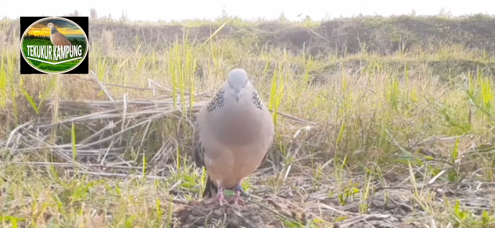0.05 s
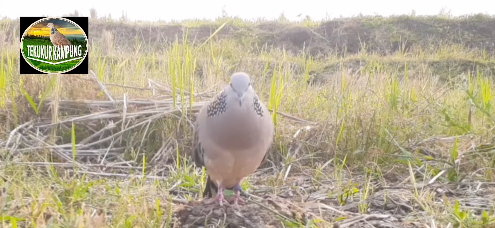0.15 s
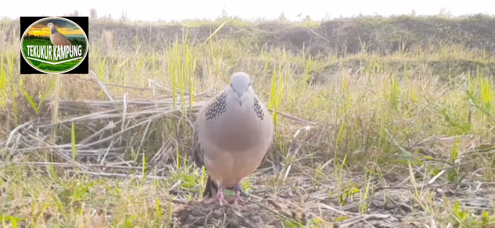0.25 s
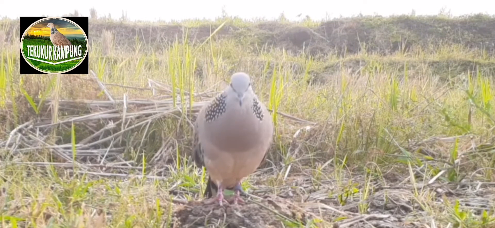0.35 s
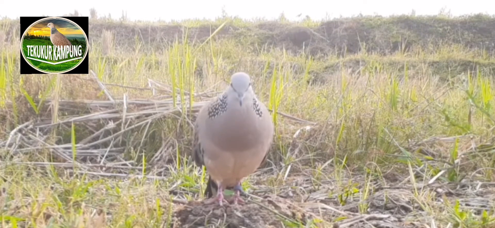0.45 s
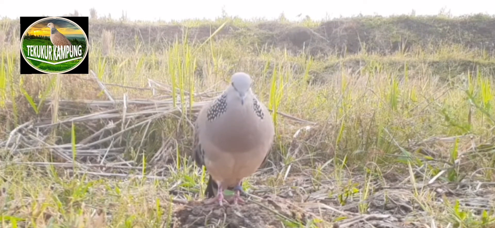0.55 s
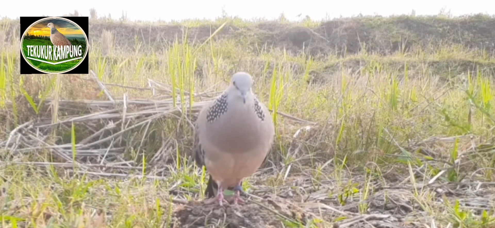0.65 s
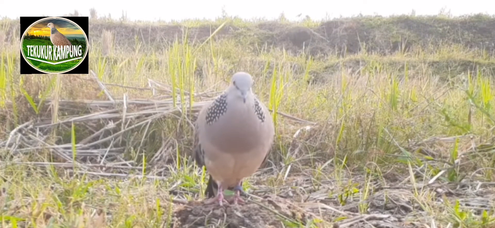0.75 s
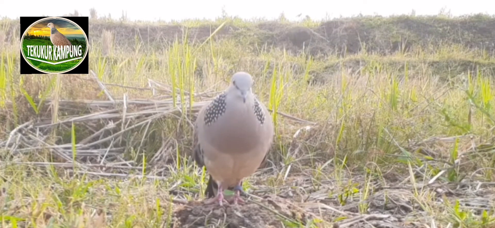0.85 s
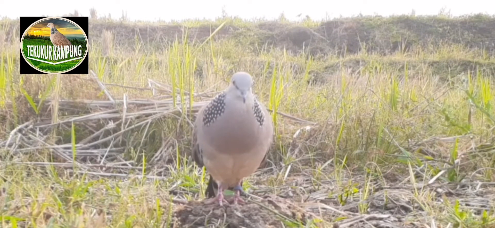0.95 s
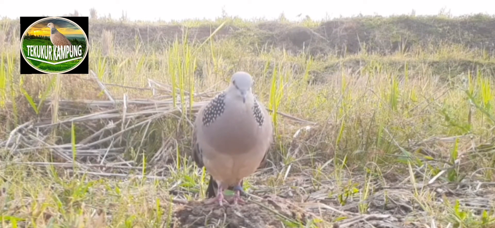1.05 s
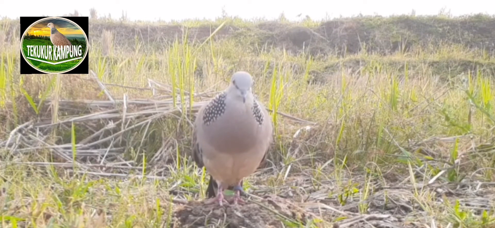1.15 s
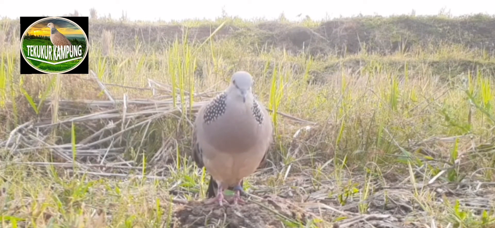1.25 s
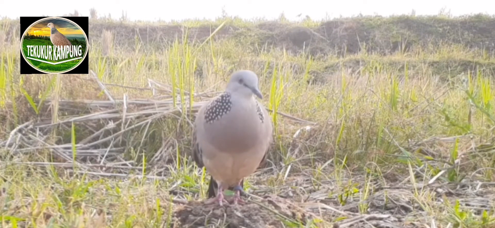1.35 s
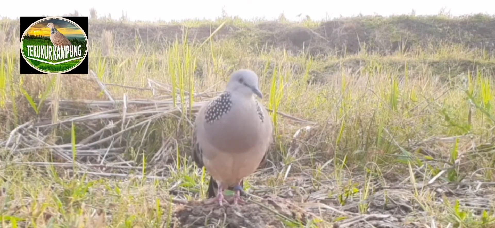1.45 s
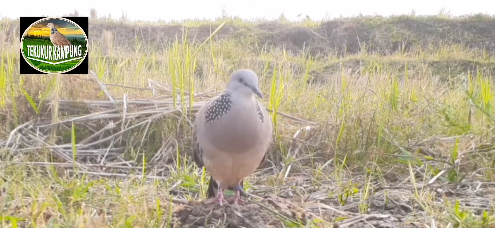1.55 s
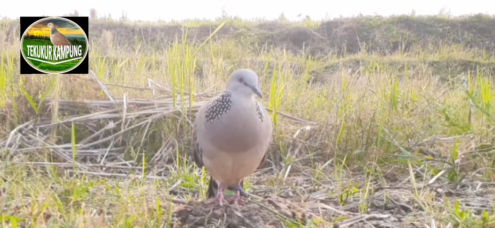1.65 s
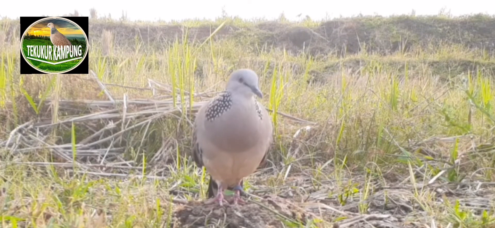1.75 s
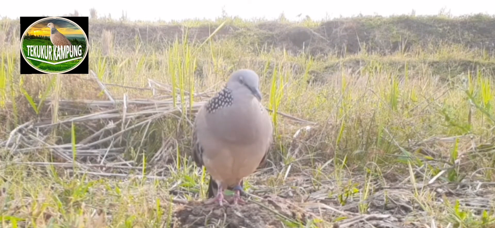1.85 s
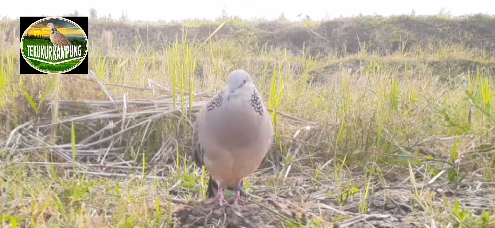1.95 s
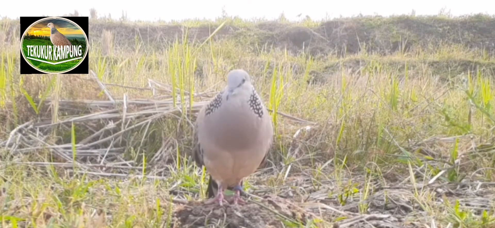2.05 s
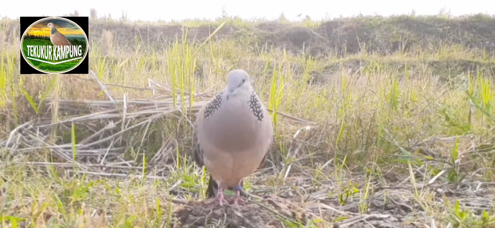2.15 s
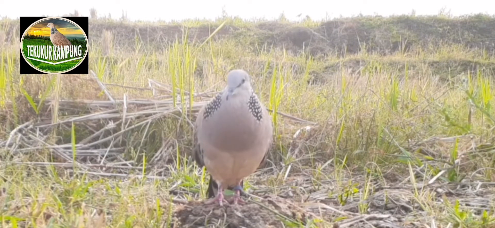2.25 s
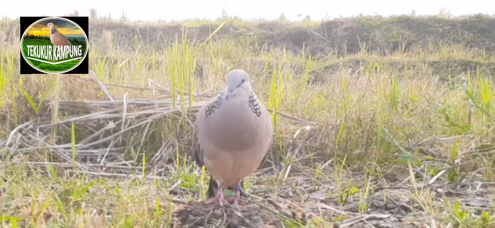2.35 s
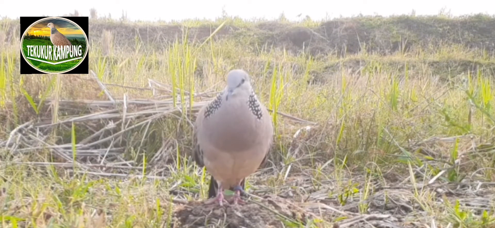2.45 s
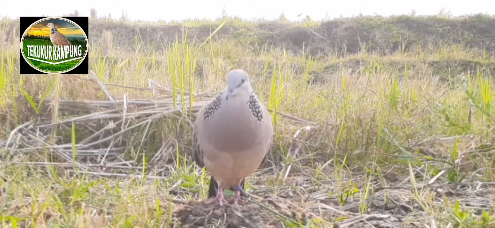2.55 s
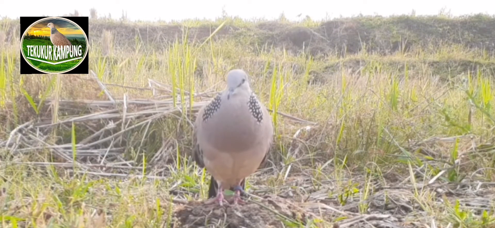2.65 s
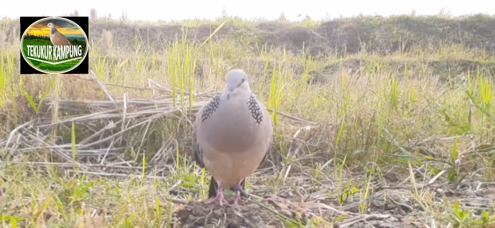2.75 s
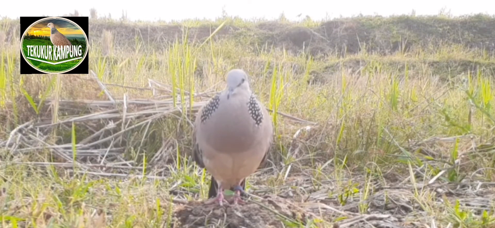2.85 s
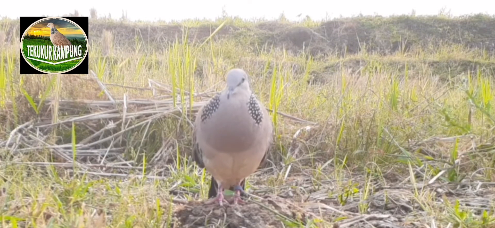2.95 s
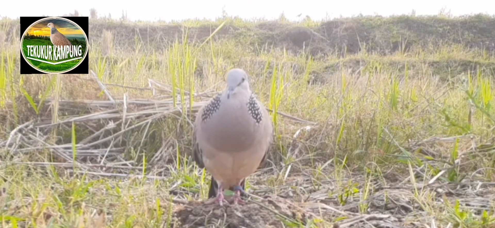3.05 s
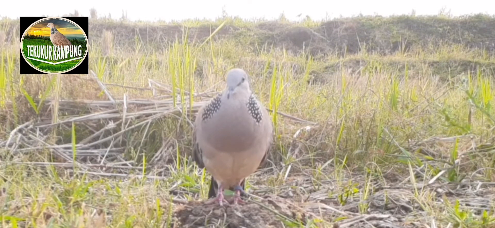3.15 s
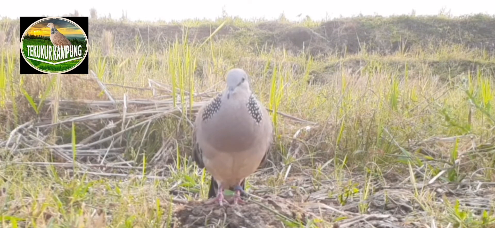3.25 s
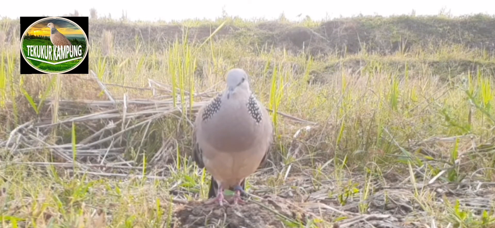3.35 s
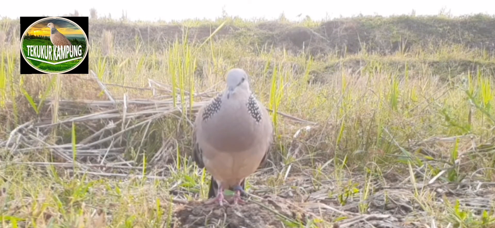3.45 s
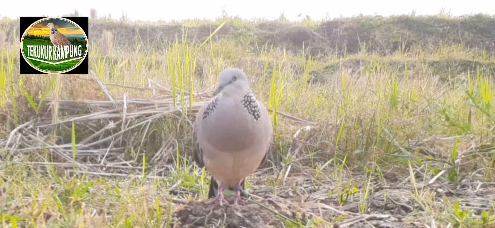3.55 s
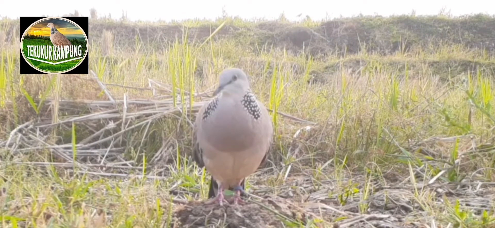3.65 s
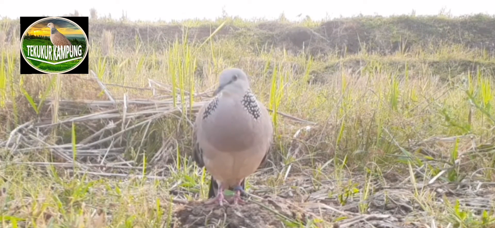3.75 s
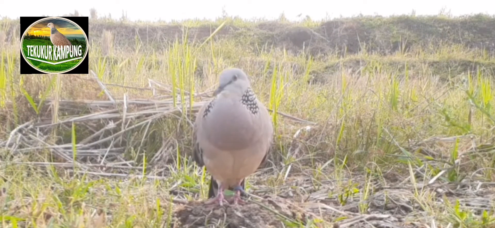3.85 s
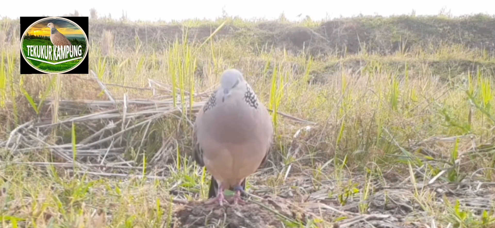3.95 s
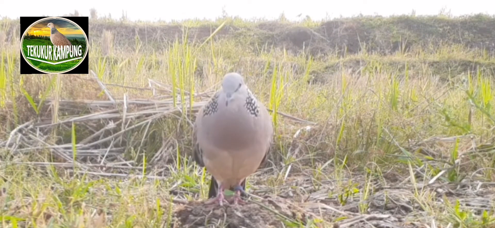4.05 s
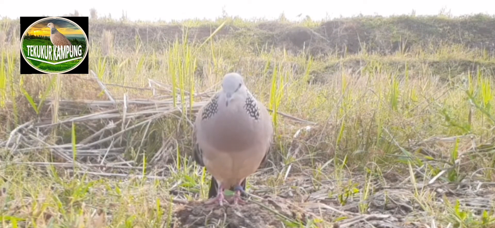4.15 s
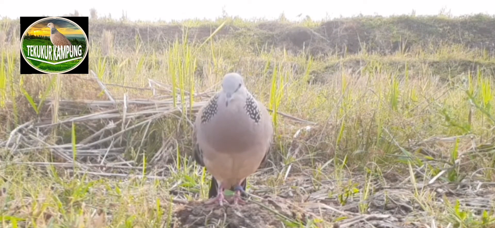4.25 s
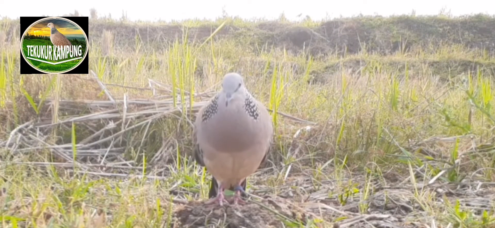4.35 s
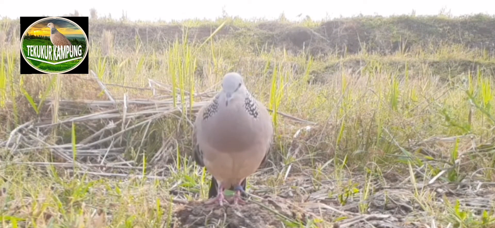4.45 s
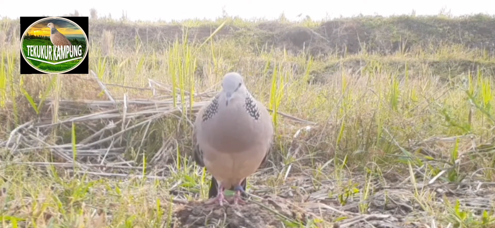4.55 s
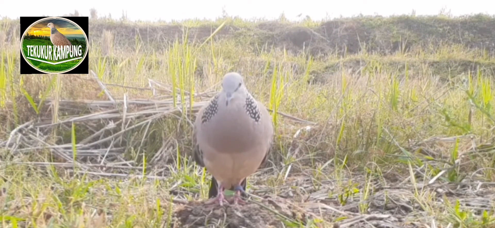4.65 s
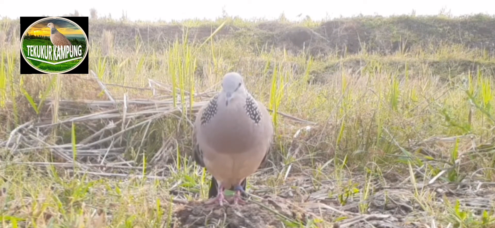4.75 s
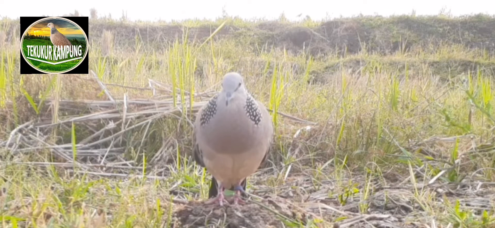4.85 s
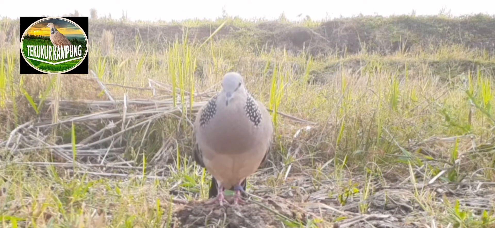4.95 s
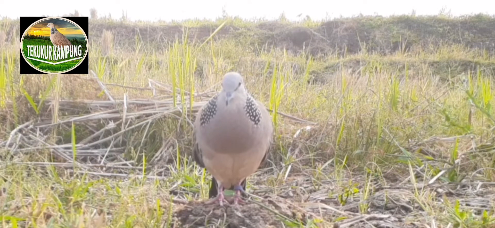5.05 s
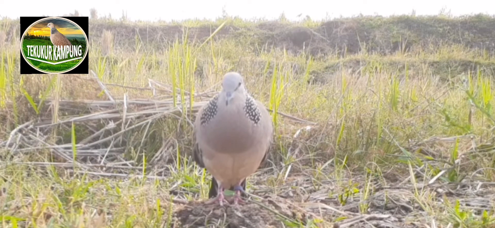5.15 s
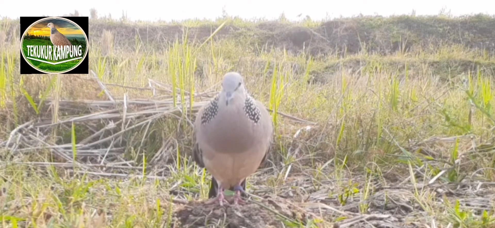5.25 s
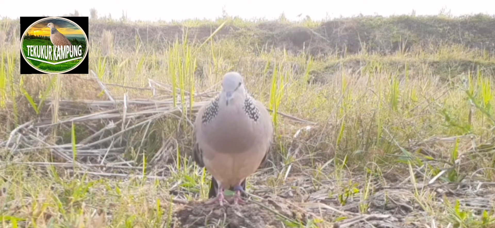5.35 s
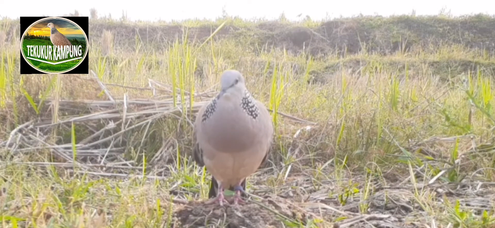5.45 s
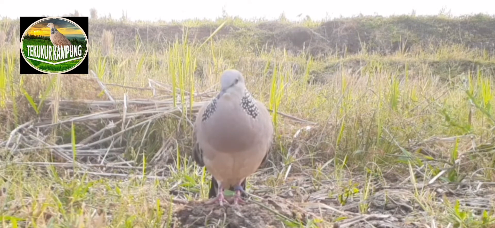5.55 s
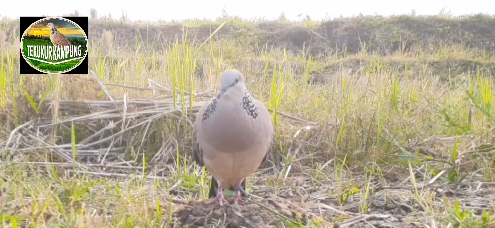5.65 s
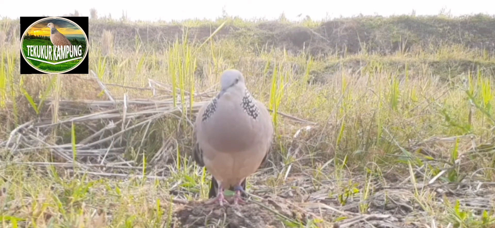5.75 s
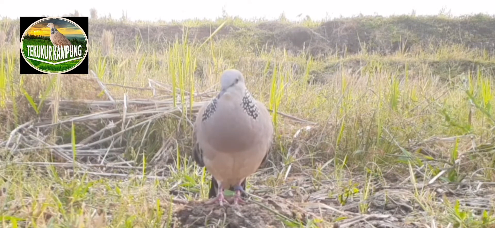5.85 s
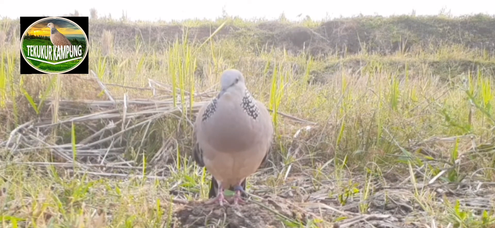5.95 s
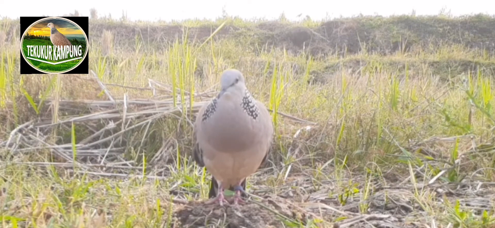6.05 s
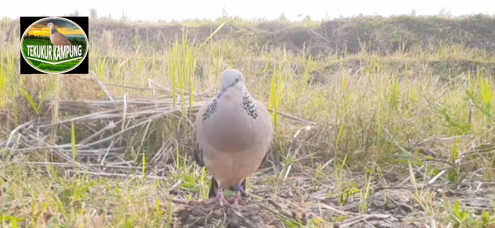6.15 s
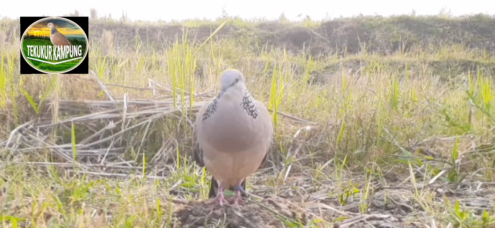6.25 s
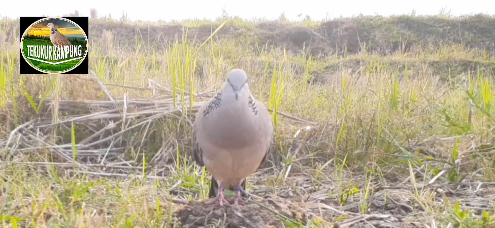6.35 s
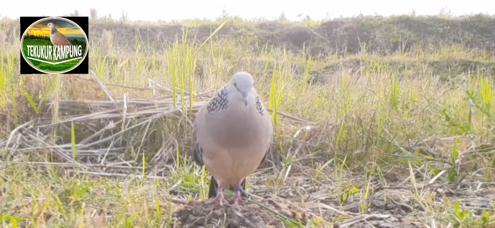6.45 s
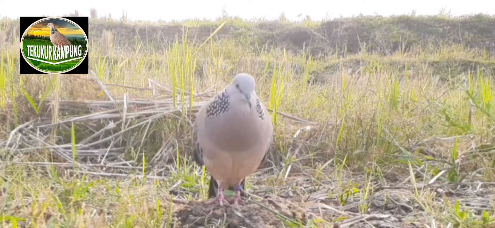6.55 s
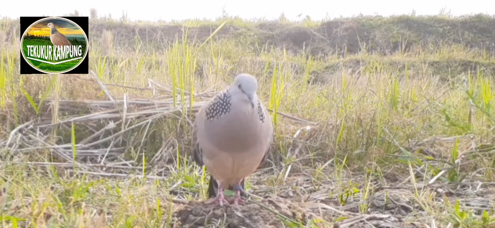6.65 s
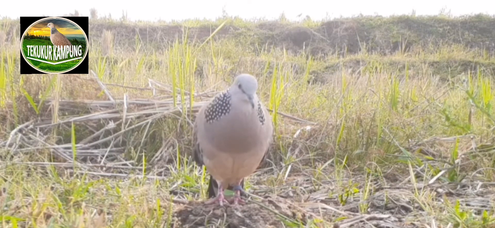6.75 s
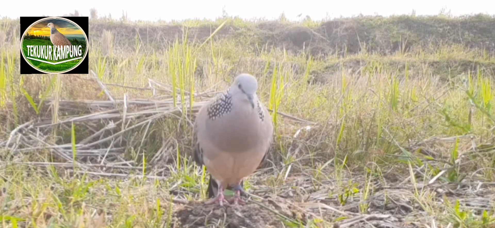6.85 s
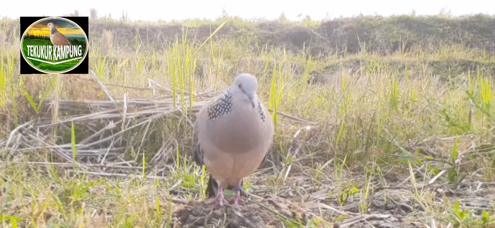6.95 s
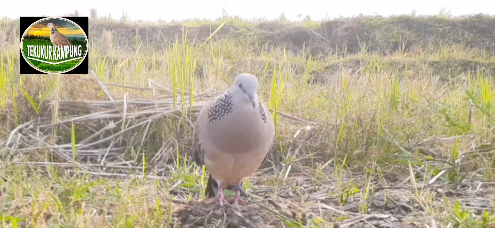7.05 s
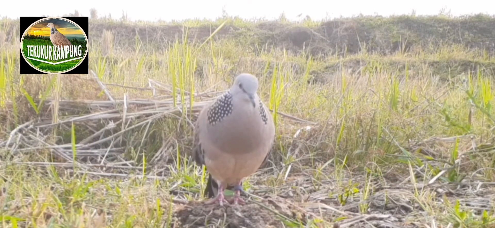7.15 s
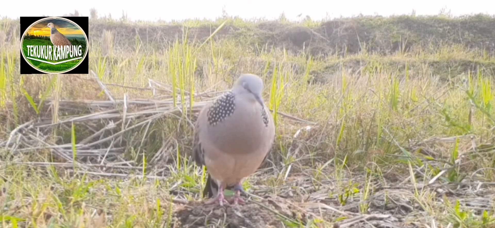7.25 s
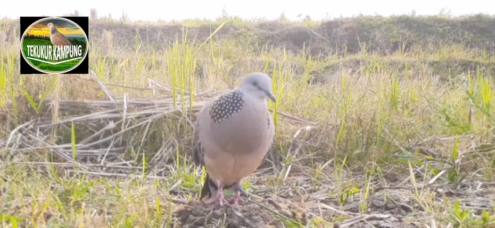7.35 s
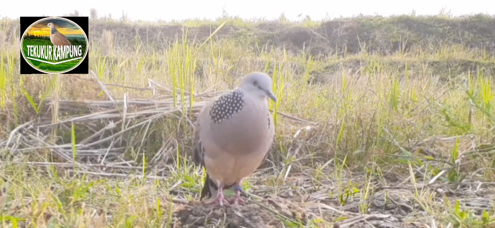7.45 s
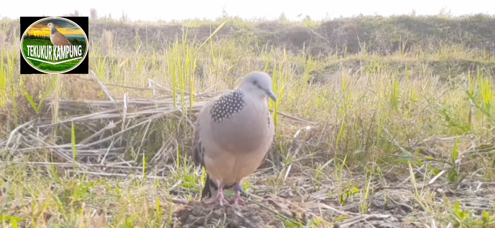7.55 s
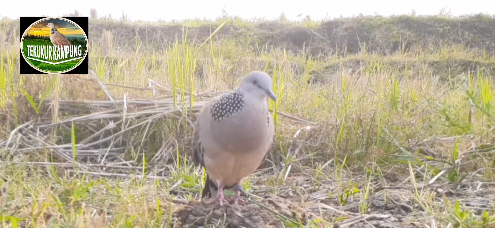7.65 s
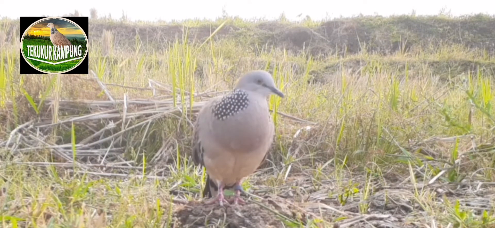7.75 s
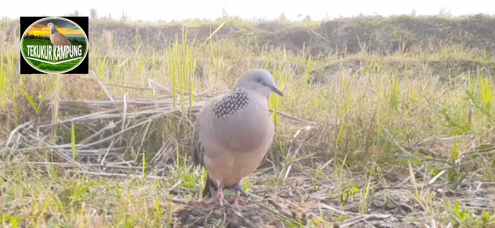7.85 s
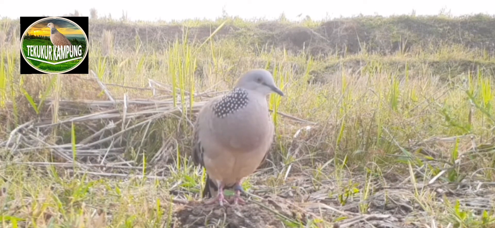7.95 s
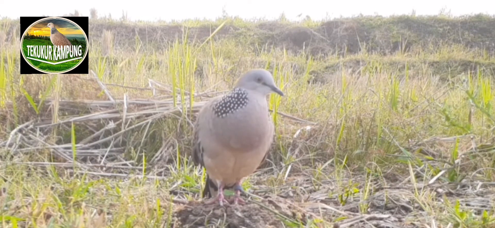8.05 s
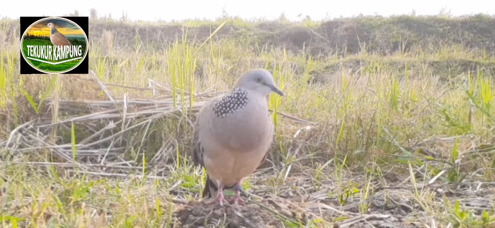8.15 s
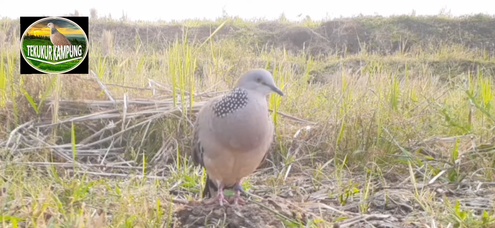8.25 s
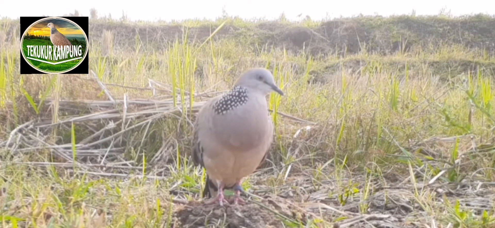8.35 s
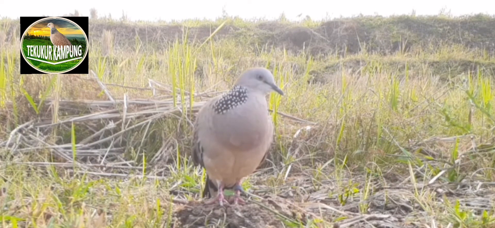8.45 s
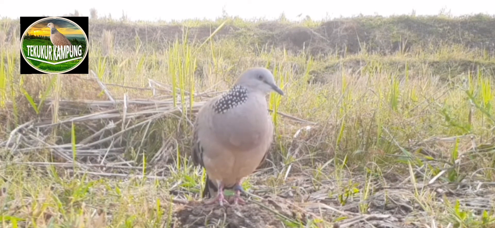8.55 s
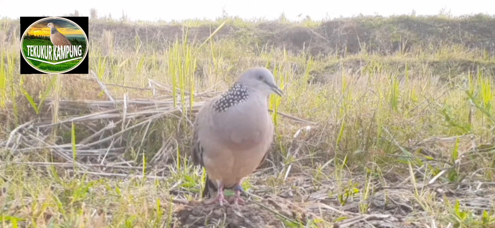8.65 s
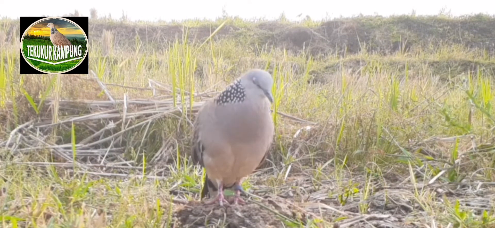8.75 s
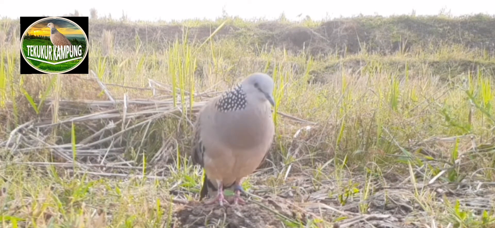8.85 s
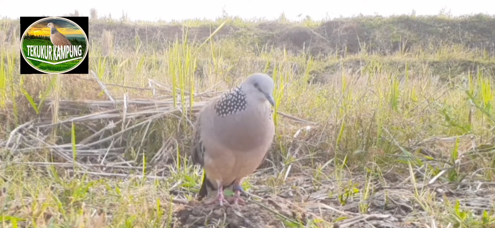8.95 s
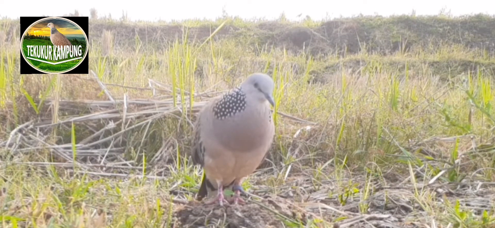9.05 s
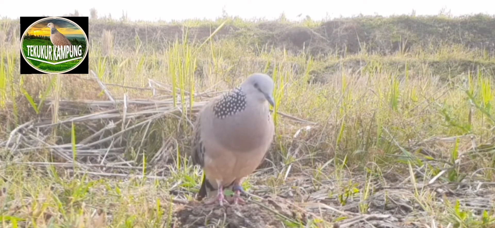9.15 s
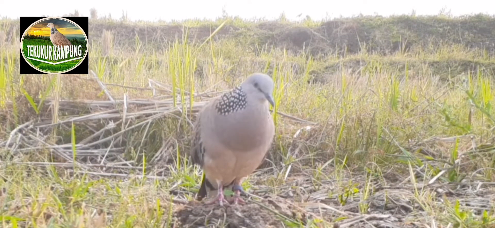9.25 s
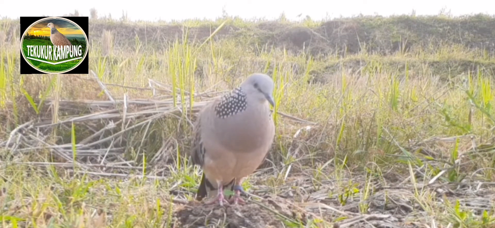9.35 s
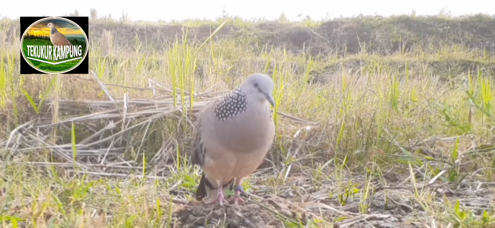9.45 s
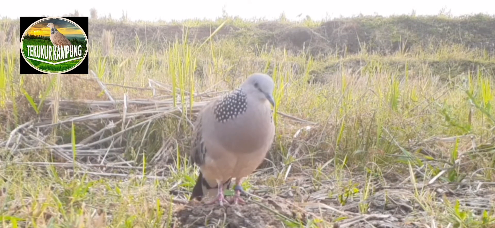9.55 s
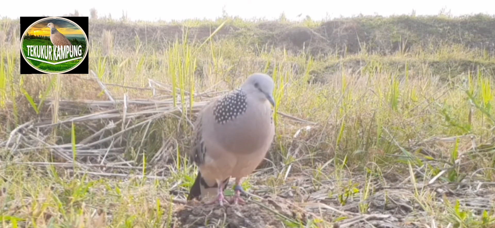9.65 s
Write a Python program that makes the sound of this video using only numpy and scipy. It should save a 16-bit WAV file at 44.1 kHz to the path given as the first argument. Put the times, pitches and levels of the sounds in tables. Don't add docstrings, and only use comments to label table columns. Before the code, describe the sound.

A spotted dove calls close to the microphone in a dry open field, slightly left of centre. Five times it gives two short, round hoots joined by a rattling murmur, then a longer fluttering coo that slides down and fades. Between calls there is faint low traffic rumble, soft air hiss and thin high cicadas to the left. Another dove answers very faintly from far off.

```python
import sys
import numpy as np
from scipy import signal
from scipy.fft import rfft, irfft
from scipy.io import wavfile
from scipy.ndimage import uniform_filter1d

SR = 44100
rng = np.random.default_rng(int(sys.argv[2]) if len(sys.argv) > 2 else 0)


def transcribe(signal):
    frames = np.atleast_2d(signal).T
    limited = np.clip(frames, -1, 1)
    pcm = np.round(limited * 32767).astype(np.int16)
    wavfile.write(sys.argv[1], SR, pcm)


def ratio_of_db(decibels):
    return 10 ** (np.asarray(decibels, float) / 20)


N = 427329

# start in seconds, faltering in seconds,
# level of the hoot in dB, level of the murmur after it in dB.
FIRSTS = [
    (.003, .081, -1, 6),
    (1.886, 1.958, -1.5, 1),
    (3.928, 4.005, -0.5, 0),
    (6.42, 6.492, 2, -1),
    (8.757, 8.833, 1, -0.5),
]
# start in seconds, start of the slide in seconds, level in dB, air at the bill in dB.
ROLLS = [
    (0.477, 0.868, 0.5, 4),
    (2.373, 2.726, 0.35, -1),
    (4.429, 4.803, 0.42, 1.5),
    (6.928, 7.302, 0.13, 1.5),
    (9.275, 9.642, 0.3, -.5),
]


def dove():
    pitch_hz, gain = pitch_and_gain(coos())
    rows = breaks()
    shut = valve(rows, spread=1.6, taper=.65)
    rolling = uniform_filter1d(shut, round(.035 * SR))
    leak = ratio_of_db(48 * np.log2(750 / pitch_hz) ** 2)
    flutter_hz = 97.7 * (1 + 0.074 * drift(5.2))
    quiver = 0.009 * leak * np.sin(2 * np.pi * np.cumsum(flutter_hz) / SR)

    tension = membrane_tension(gain, rows, rolling, quiver)
    phase = 2 * np.pi * np.cumsum(pitch_hz * tension) / SR
    flow = air_flow(gain, shut, quiver)

    coo = crop(pitch_hz, flow, phase)
    coo += overtones(gain, flow, leak, phase)
    coo += bill(flow, phase)
    coo += air_noise(gain, flow, rolling)
    return coo, gain


def coos():
    # seconds after its start, pitch in Hz, level in dB.
    first_hoot = [
        (.004, 539.4, -49),
        (.021, 645, -13.5),
        (.034, 717, -15),
        (.052, 733, -12.5),
        (.073, 706, -10.5),
        (.083, 631, -13.5),
        (.112, 473, -32.5),
    ]
    # seconds from full voice, pitch in Hz, level in dB.
    second_hoot = [
        (-.072, 453.3, -29.5),
        (0, 680.3, -8.5),
        (.011, 737, -11),
        (.033, 738, -10),
        (.073, 710.1, -8),
        (.088, 650, -9),
        (.096, 566, -17),
        (.11, 550.5, -37.5),
    ]
    # seconds after its start, pitch in Hz, level in dB.
    roll_shape = [
        (.004, 546, -48),
        (.02, 625, -14.5),
        (.05, 747.1, -15),
        (.32, 728, -10),
        (.365, 657, -11),
        (.44, 557, -18.5),
        (.5, 482, -29.5),
        (.53, 442, -38),
        (.548, 445, -61),
    ]
    # full voice in seconds, stop in seconds, level in dB.
    seconds = [
        (.232, 0.313, -1.5),
        (2.111, 2.198, -.5),
        (4.176, 4.26, -0.12),
        (6.662, 6.758, -0.19),
        (9.016, 9.105, 0),
    ]
    falter_s, stop_s, knee_s = .073, .088, .365
    top_s = roll_shape[2][0]
    tables = []
    for first_row, second_row, roll_row in zip(FIRSTS, seconds, ROLLS):
        start, falter, first_db, murmur_db = first_row
        full, stop, second_db = second_row
        roll, knee, roll_db, _ = roll_row
        first = stretched(first_hoot, [0, falter_s], [start, falter], first_db)
        second = stretched(second_hoot, [0, stop_s], [full, stop], second_db)
        murmur = np.array([first[-1], second[0]])
        murmur = murmur + [0, 9 * murmur_db, murmur_db]
        tables.append(np.vstack([first[:-1], murmur, second[1:]]))
        tables.append(stretched(roll_shape, [top_s, knee_s], [roll + top_s, knee], roll_db))
    return tables


def stretched(shape, marks, times, db):
    s, hz, level_db = np.transpose(shape)
    moved_s = s + np.interp(s, marks, np.subtract(times, marks))
    return np.transpose([moved_s, hz, level_db + db])


def breaks():
    # first in seconds, last in seconds, first gap in ms, last gap in ms, depth 0-1.
    rattles = [(0.0657, 0.227, 15.5, 11.4, .86), (0.5099, 0.603, 22.4, 14.2, .9),
               (.616, 0.78, 13.8, 13.7, .72), (1.98, 2.1097, 15.8, 12.6, .66),
               (2.409, 2.6112, 26, 15.2, .82), (4.0344, 4.172, 15.3, 12.3, .68),
               (4.4618, 4.665, 24.3, 16.5, 0.8), (4.6768, 4.741, 13.2, 13.1, .75),
               (6.518, 6.659, 16, 11.8, 0.7), (6.965, 7.1486, 24.3, 16.4, 0.8),
               (8.8677, 9.0107, 15.5, 11.9, 0.7), (9.308, 9.5246, 25, 14.4, 0.8)]
    # time in seconds, depth 0-1.
    stumbles = [(.7923, 0.8), (.822, .8), (.8478, .38), (.8793, .7), (2.6257, .86), (2.6441, .7),
                (2.6569, 0.9), (2.7334, .85), (2.801, .4), (4.0058, .9), (4.018, .5), (4.77, .55),
                (4.7848, .6), (4.8066, .65), (6.4908, .7), (6.5035, .9), (7.1883, .68), (7.2032, .9),
                (7.2759, .72), (7.3033, 0.7), (7.318, .58), (7.3684, .33), (7.394, .4), (8.8368, 0.9),
                (8.8501, .7), (9.5723, .7), (9.5845, .76), (9.642, 0.7)]
    ripples = [.053, 2.667, 2.69, 4.757, 7.163, 7.176, 7.222, 7.241, 9.543, 9.558, 9.607, 9.622, 9.667]
    rows = [(s, 3.6, depth) for s, depth in stumbles]
    rows += [(s, 6.0, .24) for s in ripples]
    for first, last, first_ms, last_ms, depth in rattles:
        count = round(2000 * (last - first) / (first_ms + last_ms))
        gaps = np.linspace(first_ms, last_ms, count)
        times = first + (last - first) * np.append(0, np.cumsum(gaps)) / gaps.sum()
        times[1:-1] += .0008 * rng.standard_normal(len(times) - 2)
        gaps = np.append(gaps, last_ms)
        depths = depth + 0.019 * (gaps - gaps.mean())
        depths += .1 * (1 - depth) / .3 * rng.standard_normal(len(gaps))
        widths_ms = 4.3 + .55 * (gaps - 14)
        rows += zip(times, widths_ms, np.clip(depths, .1, 1))
    return rows


def valve(rows, spread, taper):
    shut = np.zeros(N)
    for s, width_ms, depth in rows:
        dip = depth * signal.windows.tukey(round(width_ms * spread * SR / 1000), min(taper, 1))
        at = round(s * SR) - len(dip) // 2
        shut[at:at + len(dip)] += dip
    return np.clip(shut, 0, 1)


def membrane_tension(gain, rows, rolling, quiver):
    full_slack_ms, recover_s = 5.0, 0.0014
    slack_rows = [(s, ms, depth * min(ms / full_slack_ms, 1)) for s, ms, depth in rows]
    slack = lag(valve(slack_rows, spread=2.6, taper=0.99), recover_s)
    slack = .75 * np.tanh(slack / .6)
    slope_db = np.abs(np.gradient(20 * np.log10(gain + 1e-4))) * SR
    faint = rounded(np.clip(slope_db / 1300 - .5, 0, 1) * np.exp(-gain / .07))
    return 1 - 0.34 * (slack - .6 * rolling) - 0.33 * faint + 0.49 * quiver + 0.0035 * drift(81)


def air_flow(gain, shut, quiver):
    surge = 0.85 * np.maximum(lag(shut, 0.010) - shut, 0)
    opening = 1 - 1.3 * shut ** 1.3
    return gain * rounded(opening * (1 + surge)) * (1 + quiver)


def crop(pitch_hz, flow, phase):
    crop_hz, width_hz, share = 610, 170, 0.93
    detuning = (pitch_hz ** 2 - crop_hz ** 2) / (pitch_hz * width_hz)
    steady_gain = np.abs(1 + share / (1 + 1j * detuning))
    direct = np.sqrt(2) * flow / steady_gain * np.sin(phase)
    return direct + share * resonate(direct, crop_hz, width_hz)


def overtones(gain, flow, leak, phase):
    # multiple of the pitch, level in dB.
    half_tones = [
        (.5, -52),
        (1.5, -56),
        (2, -49),
    ]
    # multiple of the pitch, level in dB.
    leaks = [
        (3, -77),
        (4, -79),
    ]
    uneven = sum(ratio_of_db(db + 1.2 * drift(12)) * np.sin(k * phase) for k, db in half_tones)
    high = sum(ratio_of_db(db + 2.1 * drift(30)) * np.sin(k * phase) for k, db in leaks)
    return flow * leak * uneven + flow * (gain / .33) ** 2 * high


def bill(flow, phase):
    ringing = resonate(flow * np.sin(8 * phase), 5930, 200, times=2)
    return ratio_of_db(-57 + 3.5 * drift(40)) * ringing


def air_noise(gain, flow, rolling):
    # resonance in Hz, width in Hz, level in dB.
    nostril = [
        (5450, 1100, 5.5),
        (4900, 540, -2),
    ]
    white = rng.standard_normal(N)
    breath = rms_one(resonate(white, 860, 230, times=2)) * np.sqrt(gain)
    hiss = rms_one(sum(ratio_of_db(db) * resonate(white, hz, width, times=2) for hz, width, db in nostril))
    hiss = hiss * ratio_of_db(in_time([(knee, air_db) for _, knee, _, air_db in ROLLS])[0])
    strength = (.6 * gain + .4 * flow) * (.1 + 2.5 * lag(rolling, .02))
    return ratio_of_db(-47.5) * breath + ratio_of_db(-53.5) * strength * hiss


def gulps():
    t = np.arange(N) / SR
    lead_s, length_s = .007, .005
    shape = sum(ratio_of_db(2 * db) * np.exp(-.5 * ((t - s + lead_s) / length_s) ** 2) for s, _, db, _ in FIRSTS)
    noise = resonate(rng.standard_normal(N), 720, 300, times=2)
    return ratio_of_db(-59) * shape * rms_one(noise)


def croak():
    # time in seconds, pulse rate in Hz, level in dB.
    swallow = [
        (4.322, 197.2, -66.5),
        (4.34, 190.3, -38.5),
        (4.365, 175.5, -39.5),
        (4.385, 165, -44),
        (4.405, 143.4, -64.5),
    ]
    rate_hz, gain = pitch_and_gain([swallow])
    cycles = np.cumsum(rate_hz * (1 + .06 * drift(60))) / SR
    pulses = np.diff(np.floor(cycles), prepend=0)
    ringing = resonate(pulses, 570, 200) + 0.94 * resonate(pulses, 350, 300)
    lowpass = signal.butter(12, 800, fs=SR, output="sos")
    return gain * rms_one(signal.sosfilt(lowpass, ringing))


def echoes(x):
    # delay in seconds, left level in dB, right level in dB.
    slap_s, left_db, right_db = (.037, -29.5, -33.5)
    scrub_t60_s = .3
    t = np.arange(SR // 3) / SR
    scatter = rng.standard_normal((2, len(t))) * ratio_of_db(-60 * t / scrub_t60_s) * (t > .008)
    response = ratio_of_db(-36) * scatter / np.sqrt(np.sum(scatter ** 2, axis=1, keepdims=True))
    response[:, round(slap_s * SR)] += ratio_of_db([left_db, right_db])
    return signal.fftconvolve(x[None], response, axes=1)[:, :N]


def far_dove():
    # time in seconds, pitch in Hz, level in dB.
    far_notes = [
        [(5.44, 700, -83), (5.5, 720, -73), (5.62, 735, -76), (5.68, 700, -83)],
        [(5.78, 743, -82), (5.86, 760, -69), (5.97, 700, -68), (6.06, 583, -69)],
        [(7.6, 686, -87), (7.68, 720, -75), (7.78, 750, -72), (7.82, 734, -91)],
        [(7.92, 744, -71), (7.98, 770, -70), (8.04, 757, -76), (8.1, 705, -59.5), (8.16, 642, -85)],
    ]
    pitch_hz, gain = pitch_and_gain(far_notes)
    level = gain * ratio_of_db(6.1 * drift(17))
    return level * np.sin(2 * np.pi * np.cumsum(pitch_hz * (1 + 0.0122 * drift(29))) / SR)


def cicadas(hz, width_hz, beat_hz, depth, right_db):
    throb = 1 + depth * np.sin(2 * np.pi * np.cumsum(beat_hz * (1 + 0.037 * drift(2.8))) / SR)
    chorus = resonate(rng.standard_normal((2, N)) * throb, hz, width_hz, times=3)
    return rms_one(chorus) * ratio_of_db(.8 * drift(9)) * ratio_of_db([[4.5], [right_db]])


def choruses():
    t = np.arange(N) / SR
    high_db = -80 + 7.5 / (1 + np.exp((6.3 - t) / .2))
    first_s, every_s, length_s = .26, .993, .25
    calling = np.abs((t - first_s + every_s / 2) % every_s - every_s / 2) < length_s / 2
    low_db = -76.5 - 14 * (1 - lag(calling * 1., .015))
    steady = ratio_of_db(-60.5 + 0.29 * drift(.8)) * cicadas(9160, 1400, 132, depth=0.22, right_db=-5.0)
    high = ratio_of_db(high_db) * cicadas(11000, 520, 250, depth=.3, right_db=-4.5)
    low = ratio_of_db(low_db) * cicadas(7880, 450, 95, depth=.4, right_db=-4)
    return steady + high + low


def traffic():
    # frequency in Hz, density in dB.
    rumble = [(15, -64.5), (25, -36.5), (53, -4), (151, -1.5), (206, -4.5), (285, -10), (422, -17.5),
              (501, -25), (585, -24.5), (1500, -53), (1950, -82), (3300, -120)]
    level = ratio_of_db(-45 + 0.76 * drift(13.0) + 1.9 * drift(0.28))
    return level * wide_noise(rumble) * ratio_of_db([[1.2], [-1.1]])


def open_air():
    # frequency in Hz, density in dB.
    air_colour = [(900, -7), (1400, -2.5), (4000, 0.5), (7000, 0.5), (10200, 3), (11400, 1.5), (11800, -6),
                  (13900, -5.5), (15600, -9)]
    return ratio_of_db(-67) * wide_noise(air_colour) * ratio_of_db([[.8], [-.8]])


def whines():
    # frequency in Hz, left level in dB, right level in dB.
    lines = [
        (13848, -80, -95),
        (10386, -87, -95),
    ]
    t = np.arange(N) / SR
    total = np.zeros((2, N))
    for hz, left_db, right_db in lines:
        total += ratio_of_db([[left_db], [right_db]]) * ratio_of_db(2.5 * drift(12)) * np.sin(2 * np.pi * hz * t)
    return total


def background_lift(effort):
    lift_db = 4 * np.tanh(lag(effort, 0.036) / 0.12)
    duck_db = 1 * np.tanh(lag(effort, 0.53) / .05)
    return ratio_of_db(lift_db - duck_db)


def wide_noise(spectrum):
    # frequency in Hz, likeness 0-1.
    likeness = [(30, 0.08), (65, 0.78), (110, 1), (300, 0.7), (1200, 0), (2500, 0), (5000, 0.02), (9000, 0)]
    hz = np.arange(1, N // 2 + 2) * SR / N
    mid, side = rfft(rng.standard_normal((2, N))) * ratio_of_db(at_hz(spectrum, hz))
    alike = np.clip(at_hz(likeness, hz), 0, 1)
    return rms_one(irfft(np.sqrt(1 + alike) * mid + np.sqrt(1 - alike) * side * [[1], [-1]], N))


def at_hz(points, hz):
    point_hz, value = np.transpose(points)
    return np.interp(np.log(hz), np.log(point_hz), value)


def in_time(rows, silent=None):
    s, *columns = np.transpose(rows)
    return [np.interp(np.arange(N) / SR, s, c, silent, silent) for c in columns]


def pitch_and_gain(tables):
    pitch_hz = in_time(np.vstack(tables))[0]
    gain = sum(ratio_of_db(in_time(table, -200)[1]) for table in tables)
    return rounded(pitch_hz), rounded(gain)


def rounded(x):
    return uniform_filter1d(uniform_filter1d(x, size=130), size=130)


def rms_one(x):
    return x / np.sqrt(np.mean(x ** 2) + 1e-20)


def lag(x, seconds):
    r = np.exp(-1 / (seconds * SR))
    return signal.lfilter([1 - r], [1, -r], x)


def drift(rate):
    seconds = 1 / (2 * np.pi * rate)
    return rms_one(lag(lag(rng.standard_normal(N + SR), seconds), seconds)[SR:])


def resonate(x, hz, width_hz, times=1):
    r = np.exp(-np.pi * width_hz / SR)
    zeros = np.array([1, 0, -1]) * (1 - r * r) / 2
    poles = [1, -2 * r * np.cos(2 * np.pi * hz / SR), r * r]
    for _ in range(times):
        x = signal.lfilter(zeros, poles, x)
    return x


def scene():
    coo, effort = dove()
    bird = coo + croak() + gulps()
    near = np.array([bird, np.roll(bird, -1)]) * ratio_of_db([[1.6], [-1.9]])
    returned = echoes(resonate(bird, 770, 220))
    field = traffic() + open_air() + choruses() + whines()
    return near + returned + background_lift(effort) * (field + far_dove())


def low_pass(x):
    return signal.sosfilt(signal.butter(12, 15730, fs=SR, output="sos"), x)


def record(dry):
    bass_cut = signal.butter(2, 58, "high", fs=SR, output="sos")
    top_cut = signal.cheby2(20, 50, 16000, fs=SR, output="sos")
    mix = signal.sosfilt(top_cut, signal.sosfilt(bass_cut, dry))
    return low_pass(mix)


dry = scene()
out = record(dry)
transcribe(out)
```